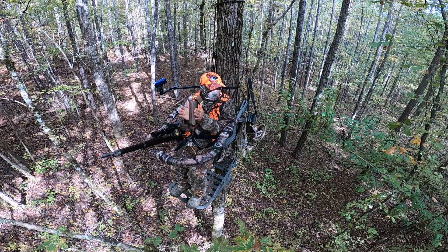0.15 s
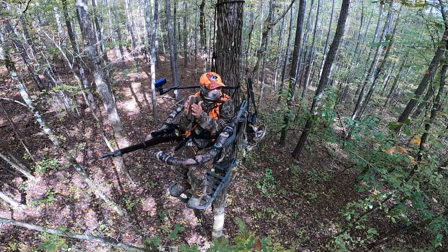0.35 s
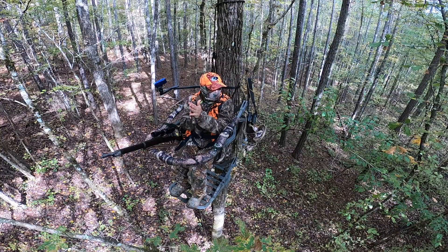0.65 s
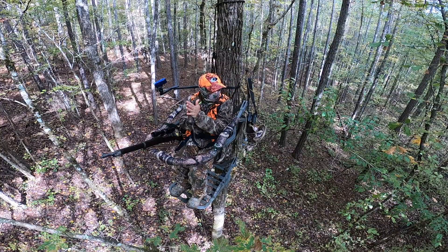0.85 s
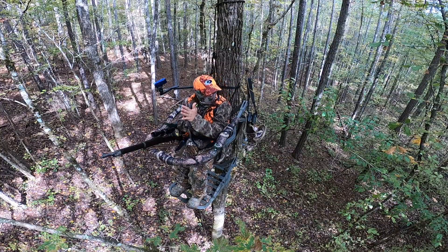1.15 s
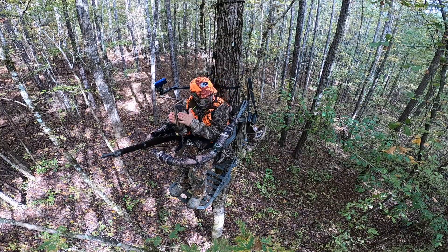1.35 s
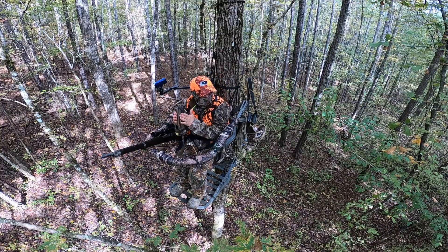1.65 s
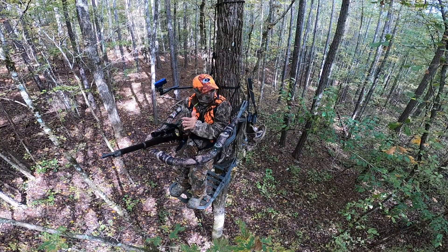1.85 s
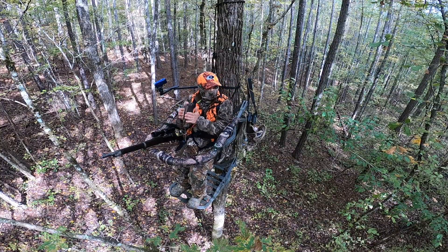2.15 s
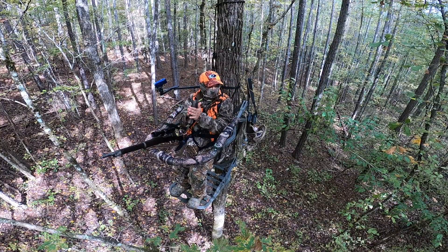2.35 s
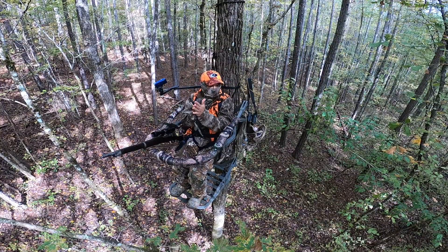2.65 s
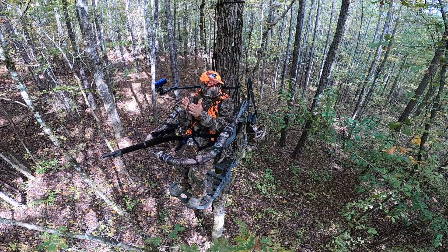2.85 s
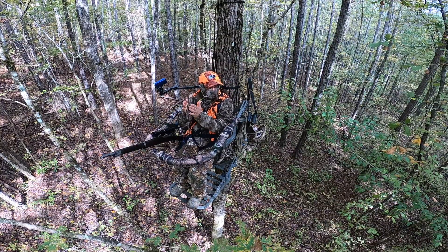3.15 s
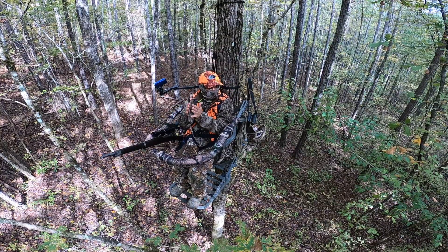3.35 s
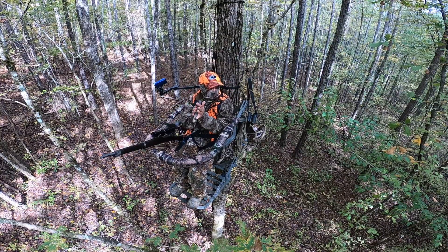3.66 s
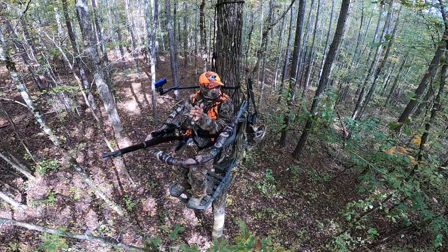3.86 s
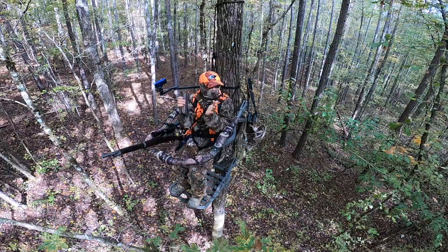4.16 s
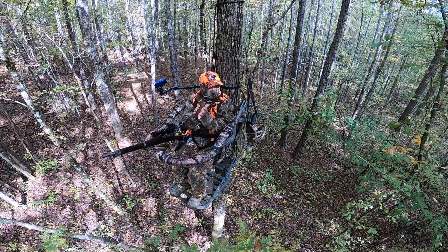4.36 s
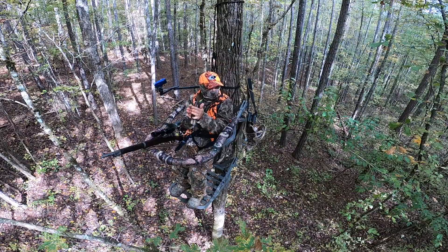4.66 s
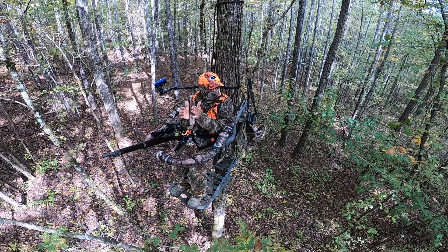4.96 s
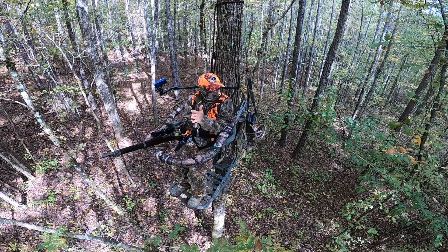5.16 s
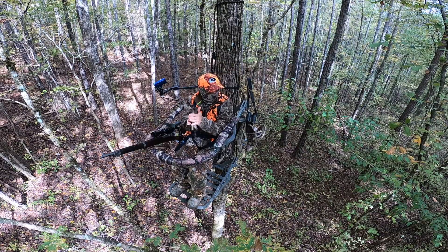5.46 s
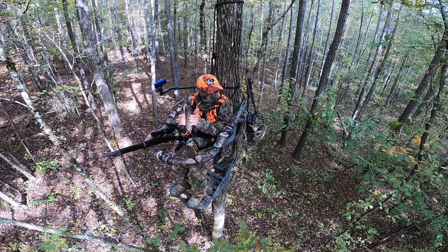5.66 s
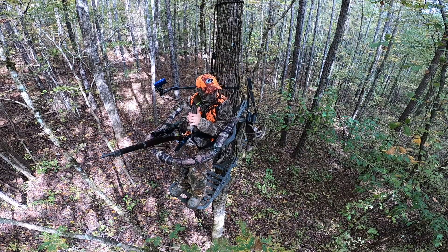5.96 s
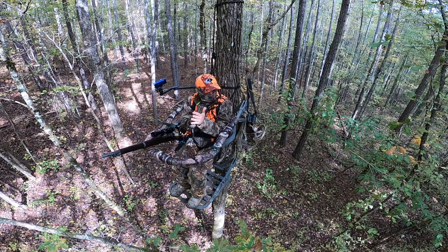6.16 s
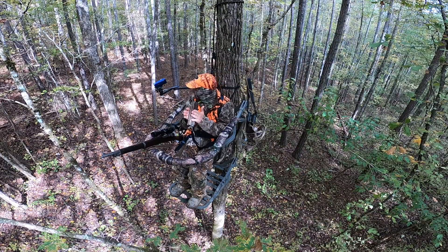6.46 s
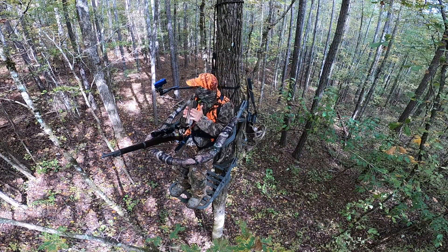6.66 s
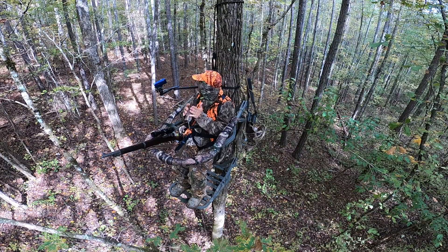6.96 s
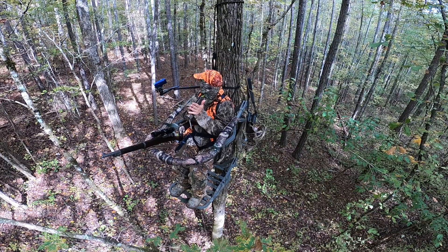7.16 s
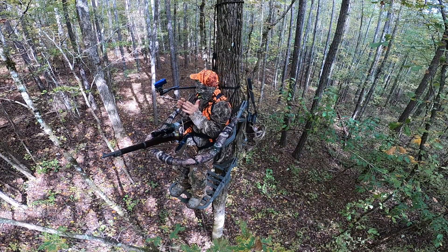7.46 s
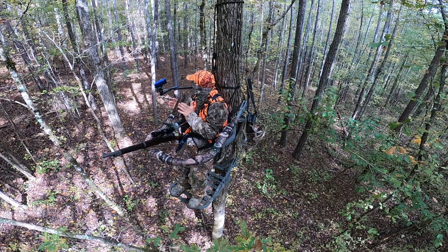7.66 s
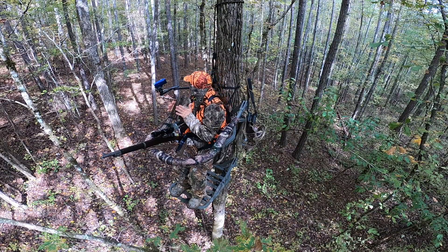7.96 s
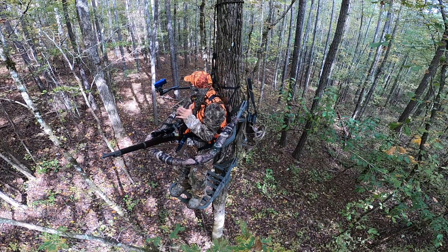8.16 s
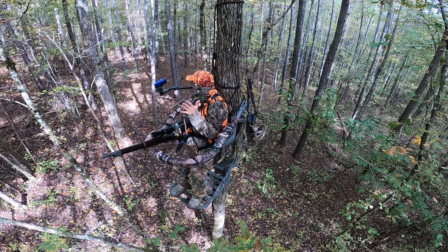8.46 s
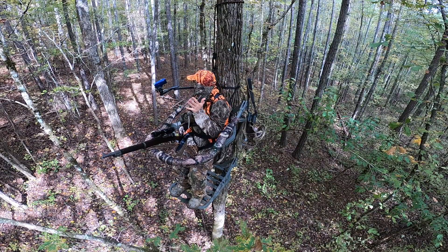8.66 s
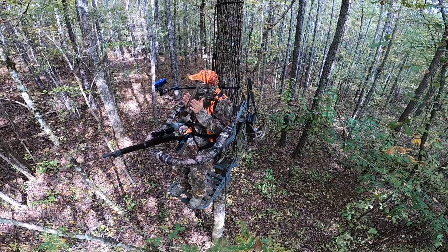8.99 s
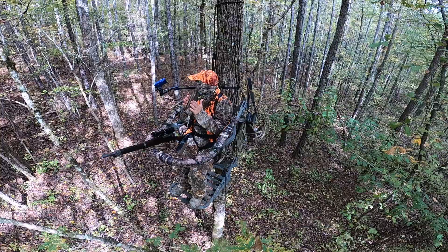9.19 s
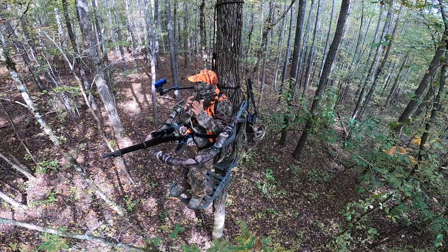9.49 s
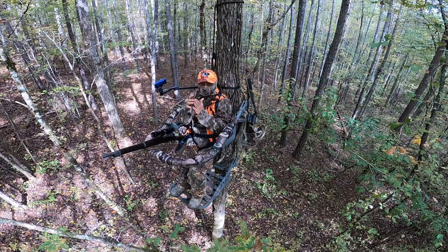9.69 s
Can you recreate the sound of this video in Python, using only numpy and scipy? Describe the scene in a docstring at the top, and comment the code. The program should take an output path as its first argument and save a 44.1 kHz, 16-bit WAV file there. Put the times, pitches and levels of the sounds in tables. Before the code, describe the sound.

A hunter in a tree rattles antlers to imitate sparring deer. Sharp, hard clacks arrive in quick bursts with lighter ticks and grinding touches between them, becoming a busy clatter midway before thinning to isolated clashes. The grip keeps each hit short and adds low thumps. The nearby stereo microphone catches mild clipping, diffuse forest reverberation, a faint wash of air and low uneven wind buffeting.

```python
"""Hard, bony clacks in quick rattling runs: two antlers are clashed and ground together by hand, in quiet woodland.
Each touch of the tines is a burst of tiny impacts that rings the antlers' modes, damped by the grip.
The hands add a dull rub and thuds; the trunks scatter every run back as a soft bright tail of shaped noise.
Behind lies a faint noise wash of air and leaves, with a lumpy low rumble of gusts on the microphone ports.
The loudest clacks overload the nearby microphone."""
import sys
import numpy as np
from scipy import signal
from scipy.fft import rfft, irfft, next_fast_len
from scipy.io import wavfile
from scipy.ndimage import uniform_filter1d

SR = 44100
rng = np.random.default_rng(int(sys.argv[2]) if len(sys.argv) > 2 else 0)


def persist_wave(psi):
    """Save psi, clipped to +-1, as 16-bit WAV."""
    counts = np.round(np.clip(psi, -1, 1) * 32767).astype(np.int16)
    wavfile.write(sys.argv[1], SR, np.atleast_2d(counts).T)


N = 433503


def from_db(db):
    """Decibels to gain."""
    return 10 ** (np.asarray(db) / 20)


def rms_one(x):
    """Scale to unit rms."""
    return x / np.sqrt(np.mean(x ** 2) + 1e-20)


def at_hz(points, hz):
    """Read a table on a log-frequency axis."""
    f, value = np.transpose(points)
    return np.interp(np.log(np.maximum(hz, 1)), np.log(f), value)


def filtered(x, hz, kind, order=2):
    """Causal Butterworth filter."""
    sos = signal.butter(order, hz, kind, fs=SR, output="sos")
    return signal.sosfilt(sos, x)


def add(out, s, sound):
    """Mix a stereo sound in at time s."""
    at = max(0, round(s * SR))
    out[:, at:at + sound.shape[1]] += sound[:, :N - at]


def air(level_db=5.0, rumble_db=5.5, rumble_hz=[21, 54], wander_db=3.0, wander_count=70):
    """A soft noise wash of distant leaves, with a lumpy rumble of air on the ports."""
    # still air and leaves: [f/Hz, relative spectral level/dB]
    air_spectrum = [(12, -31), (20, -2), (43, 1), (77, -12.5), (116, -16.5), (156, -5.5), (365, -14.5),
                    (650, -14.5), (725, -15.5), (1120, -12.5), (2420, -22), (4550, -24), (8790, -46.5),
                    (12200, -60), (14000, -67)]
    # likeness of the wash in the two channels: [f/Hz, correlation]
    air_likeness = [(30, 0.55), (150, 0.89), (500, 0.81), (1500, 0.58), (6000, 0.12)]
    # breeze in the leaves: [t/s, level/dB before level_db]
    breeze = [(0.0, -50.5), (0.35, -53.5), (1.89, -51), (2.85, -56), (3.72, -52.5), (5.64, -50.5),
              (5.78, -51), (6.74, -53), (7.17, -49.5), (8.16, -49.5), (8.27, -52.5), (9.83, -49.5)]
    # gusts on the ports: [t/s, rumble level/dB before rumble_db and the wander]
    gusts = [(0.0, -59), (0.63, -52), (1.15, -70), (1.58, -55), (2.46, -59.5), (2.6, -69), (3.42, -58.5),
             (4.76, -68.5), (5.28, -60.5), (8.19, -63.5), (9.55, -60.5), (9.83, -52)]

    size = next_fast_len(N, real=True)
    hz = np.arange(size // 2 + 1) * SR / size
    alike = np.clip(at_hz(air_likeness, hz), -1, 1)
    mid, side = rfft(rng.standard_normal((2, size)))
    pair = np.sqrt(1 + alike) * mid + np.sqrt(1 - alike) * side * [[1], [-1]]
    coloured = pair * from_db(at_hz(air_spectrum, hz))
    wash = rms_one(irfft(coloured, size)[:, :N])
    # the rumble has its own band, so the wash keeps above it
    wash = filtered(wash, rumble_hz[1], "high")

    t = np.arange(N) / SR
    breeze_db = level_db + np.interp(t, *np.transpose(breeze))
    wander = np.interp(t, np.linspace(0, N / SR, wander_count), rng.standard_normal(wander_count))
    gust_db = rumble_db + np.interp(t, *np.transpose(gusts)) + wander_db * wander
    # each port feels its own eddies as well as the shared gust
    eddies = rng.standard_normal((2, N)) + 0.42 * rng.standard_normal(N)
    rumble = rms_one(filtered(eddies, rumble_hz, "band"))
    return rumble * from_db(gust_db) + wash * from_db(breeze_db)


def woods(x, build_s=0.01, alike=0.33):
    """Countless trunks scatter the energy of each band into a diffuse tail that builds up briefly, then dies."""
    # colour of the scattered sound: [f/Hz, relative level/dB]
    scatter = [(300, -7), (800, -7.5), (1500, -2.5), (2300, -2), (3300, -2.5), (3900, -4), (5500, 0.5),
               (6900, 1.5), (8800, 0.5), (11000, -3.5), (13000, -12), (16000, -24.5)]
    # its decay: [f/Hz, time to fall by 60 dB/s]
    woods_t60 = [(300, .7), (1300, 1), (3500, 0.93), (6500, 0.77), (9200, 0.48), (15000, 0.15)]

    edges = np.geomspace(600, 16000, 15)
    # two stereo noise pairs, partly alike left and right, serve the bands in turn
    white = rng.standard_normal((2, 3, N))
    share = np.clip(alike, 0, 1)
    pairs = np.sqrt(share) * white[:, 2:] + np.sqrt(1 - share) * white[:, :2]
    rise = np.exp(-1 / (build_s * SR))
    source = x.mean(axis=0) + 1e-12 * white[0, 0]
    out = np.zeros((2, N))
    for k, band in enumerate(zip(edges, edges[1:])):
        hz = np.sqrt(np.prod(band))
        fall = np.exp(-2 * np.log(1000) / (at_hz(woods_t60, hz) * SR))
        power = filtered(source, band, "band") ** 2
        energy = signal.lfilter([(1 - rise) * (1 - fall)], np.poly([rise, fall]), power)
        noise = rms_one(filtered(pairs[k % 2], band, "band"))
        out += from_db(at_hz(scatter, hz)) * np.sqrt(np.abs(energy)) * noise
    return out


def hands(clacks, thud_db=4.5, thud_hz=[30, 215], fade_s=0.0094, body_db=-32.0, steepness=1.2):
    """The hands take up each blow: a dull rub under the heavy clacks, a thud under the hardest."""
    # hands jolted by the hardest clashes: [t/s, level/dB before thud_db and the channel balance]
    thuds = [(0.184, -27.5), (2.146, -34.5), (2.47, -29), (2.825, -34), (2.868, -32.5), (4.376, -25),
             (6.46, -24.5), (8.25, -23.5), (8.992, -27), (9.017, -20.5)]

    out = np.zeros((2, N))
    t = np.arange(SR // 10) / SR
    for s, level_db in thuds:
        push = rms_one(filtered(rng.standard_normal(len(t)), thud_hz, "band")) * np.exp(-t / fade_s)
        add(out, s, push * from_db(level_db + thud_db + np.array([[-11], [3]])))
    # 5 ms running level of the clacks in the first channel
    effort = np.sqrt(np.abs(uniform_filter1d(clacks[0] ** 2, SR // 200)))
    rub = rms_one(filtered(rng.standard_normal(N), [130, 800], "band"))
    rub_gain = from_db(body_db) * np.tanh(effort) ** steepness
    return out + rub_gain * rub * from_db([[-4], [2]])


def tine_contacts(contact_gap_s=.0105, gap_jitter=.14, skid_share=0.78, force_spread_db=1.24,
                  bright_spread_db=2.0):
    """Every touch as (s, level dB, brightness dB, skid s): a clash is a graze, a catch, an uneven run and a slip."""
    # clashes, each a quick run of tine contacts:
    # [t/s, length/s, level/dB, swell from first to last/dB, brightness/dB]
    clashes = [(0.146, .046, -6, 3, 2.5), (0.195, 0.017, -13, -3.5, 3), (0.5595, .036, -9.5, 3, 2.5),
               (0.5966, .036, -7, -3.5, 2.5), (1.3456, 0.052, -6, 0, 2.5), (1.8041, .015, -6, -2.5, 3.5),
               (1.827, .02, -6.5, 1.5, -0.5), (1.857, 0.017, -11.5, -7.5, 3), (2.1281, 0.03, -10, 2, 1.5),
               (2.1618, 0.025, -5.5, -2, 1), (2.4459, 0.041, -6.5, -3, 5), (2.8228, 0.052, -6, 0.5, 2.5),
               (3.6489, .034, -4, -1.5, 4.5), (3.9506, 0.026, -26.5, 2.5, -9.5),
               (4.2977, .019, -13.5, -1, 4.5), (4.362, 0.034, -5.5, 8, 6), (4.727, 0.046, -11, 0, -1.5),
               (4.775, .024, -4.5, -2.5, 0), (5.098, .013, -4.5, 1, 9), (5.131, 0.041, -20, 2.5, -4),
               (5.3879, .027, -7, -1.5, 1.5), (5.4196, .022, -17.5, 0, -6.5), (5.4997, .033, -23, 7, -7),
               (5.5361, 0.037, -7.5, 3, -3), (5.649, .015, -5.5, -2.5, -2), (5.6747, .029, -9, -3, 0),
               (6.026, .031, -7, 3, 5.5), (6.059, 0.049, -17, -4, 1), (6.111, .018, -8.5, -2, 3.5),
               (6.4004, 0.042, -7.5, -4.5, 3.5), (6.448, 0.02, -7, 4.5, 3.5), (7.091, .023, -10.5, 9.5, 0),
               (7.4995, .07, -9, -1.5, 3.5), (7.5832, .015, -8, -2, 2), (8.1993, .017, -7, 5.5, 4.5),
               (8.2383, .037, -5.5, -6, 8), (8.9861, 0.013, -4.5, 3.5, 1.5), (9.0094, .02, -7.5, -0.5, 3.5)]
    # single knocks between the clashes: [t/s, level/dB, brightness/dB, skid length/s]
    knocks = [(0.1235, -22.5, 2.5, 0.0055), (0.2216, -12, -0.5, 0.0094), (0.323, -22, -3.5, 0.0066),
              (0.344, -21.5, -4.5, 0.0064), (1.7935, -14, -1, .006), (2.095, -28, -3, 0.0048),
              (2.4077, -30.5, -8, 0.0054), (2.4318, -13, -1, 0.0095), (2.5144, -18, -2, .004),
              (2.895, -19.5, 7, .0055), (3.36, -43.5, -12, .006), (3.637, -19.5, -8, .006),
              (3.747, -27.5, 8, .005), (3.9326, -20.5, -3.5, .002), (4.006, -21.5, -1.5, 0.0079),
              (4.027, -7.5, 0.5, .0036), (4.038, -15, -6, .007), (4.0525, -5.5, 3, .0036),
              (4.1294, -11, -2, 0.0029), (4.2873, -21.5, -2, 0.0052), (4.326, -24, -4, 0.0079),
              (4.34, -17, 1, 0.0066), (4.711, -22.5, 0.5, .012), (4.8563, -20, 4, .005),
              (4.889, -11.5, 1, .004), (4.8984, -13.5, -4.5, 0.0067), (4.977, -27, -10, .0045),
              (4.998, -34, -9.5, .025), (5.0357, -23.5, -6.5, 0.0049), (5.083, -23, -5.5, .01),
              (5.1159, -8.5, -5, 0.0059), (5.1765, -15.5, 3, 0.0069), (5.215, -20.5, -5, .014),
              (5.2328, -12, -2, 0.0079), (5.269, -29, -3, .0095), (5.3778, -13, 1, .006),
              (5.4473, -13, -7, .0085), (5.5914, -15.5, -3.5, .005), (5.623, -28.5, -4.5, 0.0049),
              (5.7655, -25.5, -2.5, .005), (6.2043, -21, -0.5, 0.0032), (6.377, -11.5, 6, 0.0051),
              (6.3901, -8.5, 0, 0.0033), (7.128, -12, 3.5, 0.01), (7.1452, -15, -3.5, 0.0078),
              (7.437, -42.5, 4, 0.0043), (7.938, -43, 21, 0.0048), (8.327, -25, 9, 0.0058),
              (8.9477, -25.5, -4.5, 0.0046), (8.9663, -27.5, -2.5, .012)]
    # light touches round a clash, where the tines graze, catch and finally slip off:
    # [t/s, level/dB and brightness/dB relative to the clash, skid length/s]
    # graze and catch count back from its start, slip on from its end (negative: before the end)
    graze, catch, slip = (.017, -30.5, -6.0, .014), (.004, -16.0, -4.0, .004), (-0.01, -19.5, -5.5, .005)

    touches = list(knocks)
    chance = rng.standard_normal(size=(len(clashes), 3, 16))
    for (s, length_s, level_db, swell_db, bright_db), (late, force, edge) in zip(clashes, chance):
        count = int(np.clip(round(length_s / contact_gap_s), 2, len(late)))
        gap_s = length_s / count
        # the contacts share the effort of the clash unevenly
        force_db = level_db + force_spread_db * (force - force[:count].mean())
        edge_db = bright_db + bright_spread_db * (edge - edge[:count].mean())
        for k, progress in enumerate(np.linspace(-.5, .5, count)):
            # the first contact is on time, the rest stray by a share of the gap
            at = s + gap_s * (k + gap_jitter * late[k] * (k > 0))
            touches.append((at, force_db[k] + swell_db * progress, edge_db[k], skid_share * gap_s))
        fringe = ((s - graze[0], graze), (s - catch[0], catch), (s + length_s + slip[0], slip))
        for at, (_, soft_db, dull_db, skid_s) in fringe:
            touches.append((at, level_db + soft_db, bright_db + dull_db, skid_s))
    return touches


def contact(t, skid_s, bounces_per_s, bounce_db, drag_db, drag_s):
    """A first touch, micro-bounces while the ridged tines skid, then a light drag as they part."""
    happens = rng.random(len(t)) < bounces_per_s / SR
    skid = np.exp(-(t / skid_s) ** 3)
    drag = from_db(drag_db) * np.exp(-t / (drag_s + skid_s))
    force = happens * rng.standard_normal(len(t)) * from_db(bounce_db) * (skid + drag)
    force[0] = 1
    return force


def antlers(spot_db=1.55, grip_detune=0.033, grip_t60_s=.012, aim_db=1.63, aim_turn=0.18, crack_db=-18.0,
            crack_s=0.00032, low_hz=1020, lag_s=.000016, lean_db=1.27, top_hz=12000, hardening=0.39,
            touch_s=0.0013):
    """Each contact rings both antlers, as set by where the tines meet; the grip damps and bends the modes."""
    # modes of one antler: [f/Hz before the grip's detuning, relative level/dB]
    antler_modes = [(1130, -17), (1420, -5), (1760, -5), (2130, -5), (2420, -4.5), (2850, 0.5), (3180, 2),
                    (3560, -0.5), (4020, 1), (4420, -0.5), (4800, -3), (5450, -6), (6200, -5.5),
                    (6700, -10.5), (7500, -12), (8550, -9.5), (9700, -24.5), (10800, -20), (12700, -27),
                    (14600, -31)]

    hz, mode_db = np.transpose(antler_modes + antler_modes)
    t = np.arange(SR // 80) / SR
    skid_t = np.arange(SR // 22) / SR
    # brightness tilts the modes about 3100 Hz
    treble = np.tanh(2 * np.log(hz / 3100))
    # high modes radiate in lobes, so they reach the two ports more unequally
    lobes = np.array([[1], [-1]]) * hz / 4000
    out = np.zeros((2, N))
    for s, level_db, bright_db, skid_s in tine_contacts():
        spot, grip, aim, turn = rng.standard_normal((4, len(hz)))
        strength = from_db(mode_db + spot_db * spot + bright_db * treble)
        strength = strength * rng.choice([-1, 1], len(hz))
        port_gain = from_db(lobes * (aim_db * aim - lean_db) / 2)
        # the lag delays the first port against the second
        port_phase = lobes * (aim_turn * turn - np.pi * 4000 * lag_s)
        ports = port_gain * np.exp(1j * port_phase)
        spin = 2j * np.pi * hz * (1 + grip_detune * grip)
        modes = np.exp((spin - np.log(1000) / grip_t60_s)[:, None] * t)
        ring = ((strength * ports) @ modes).imag
        crack = from_db(crack_db + bright_db) * rng.standard_normal(len(t)) * np.exp(-t / crack_s)
        force = contact(skid_t, skid_s, bounces_per_s=2800, bounce_db=-8.5, drag_db=-10.5, drag_s=0.011)
        clack = signal.fftconvolve(ring + crack, force[None], axes=1)
        # harder blows make shorter contacts, which reach higher
        reach_hz = top_hz * from_db(hardening * (level_db + 9.0))
        clack = filtered(clack, min(reach_hz, .4 * SR), "low")
        # longer skids carry more energy at the same level
        power = np.sum(clack ** 2) / (2 * SR * (skid_s + touch_s))
        add(out, s, clack * from_db(level_db) / np.sqrt(power))
    # thin tines radiate little bass
    return filtered(out + 1e-18, low_hz, "high", order=4)


def scene():
    """The antlers close by, the woods around them."""
    clacks = from_db(0.45) * antlers()
    direct = clacks * from_db([[-.6], [.6]]) + hands(clacks)
    tail = woods(clacks)
    # the tail is coloured by one soft, high resonance
    resonance = signal.lfilter(*signal.iirpeak(4620, 12, fs=SR), tail)
    tail = tail + from_db(-5.0) * resonance
    return direct + from_db(-18.5) * tail + air()


def record(dry, cutoff_hz=15900):
    """The loudest clacks flatten smoothly just below full scale; then a steep low-pass cuts the top."""
    overloaded = .96 * dry / (1 + dry ** 8) ** (1 / 8)
    return signal.sosfilt(signal.ellip(8, .1, 60, cutoff_hz, fs=SR, output="sos"), overloaded)


dry = scene()
out = record(dry)
persist_wave(out)
```